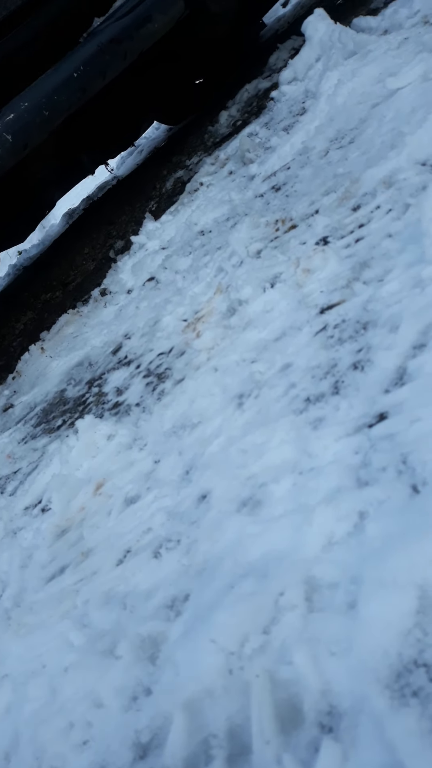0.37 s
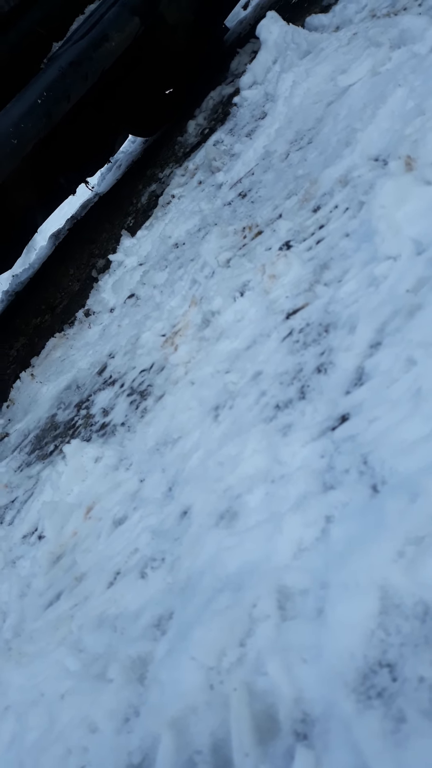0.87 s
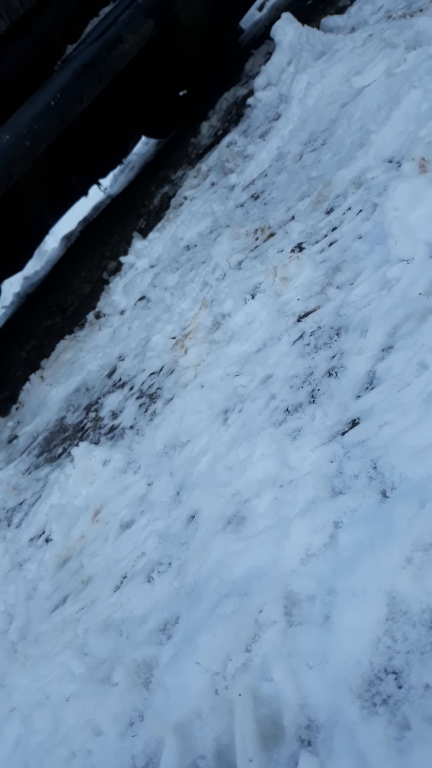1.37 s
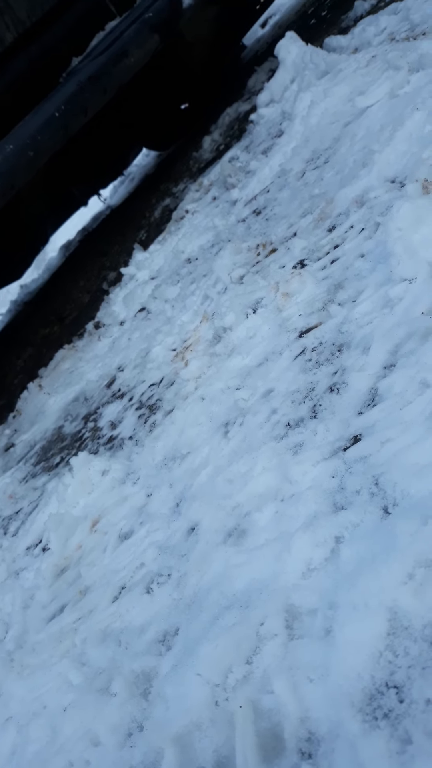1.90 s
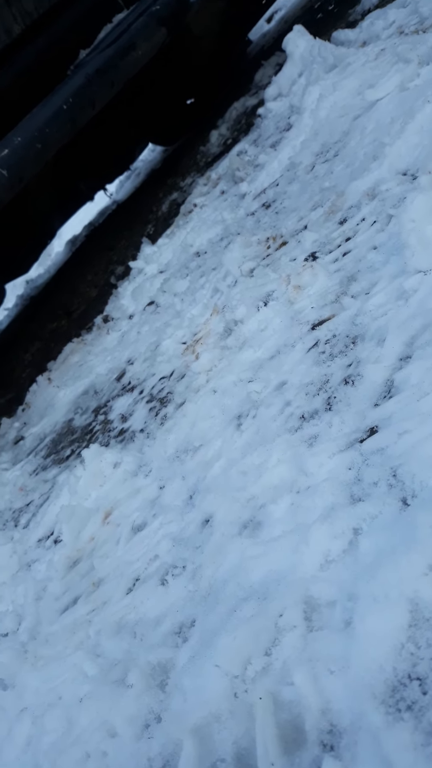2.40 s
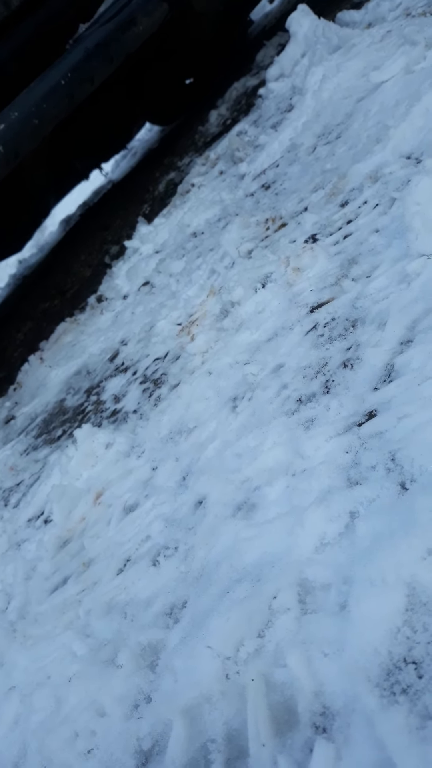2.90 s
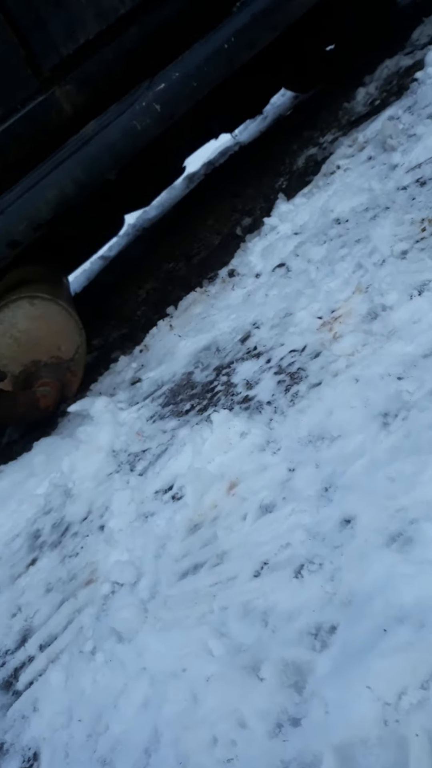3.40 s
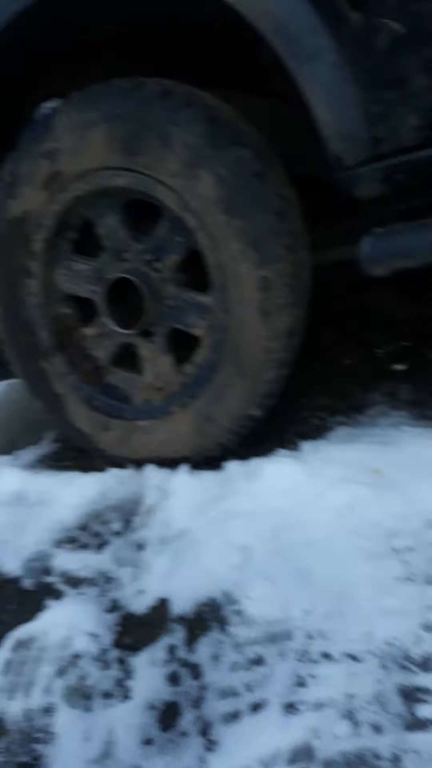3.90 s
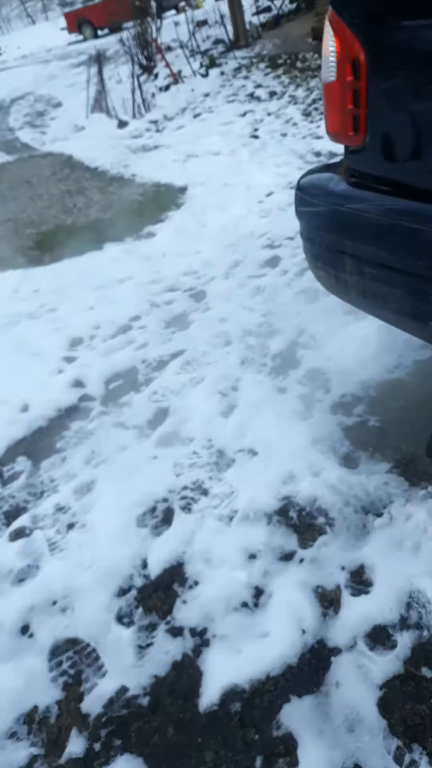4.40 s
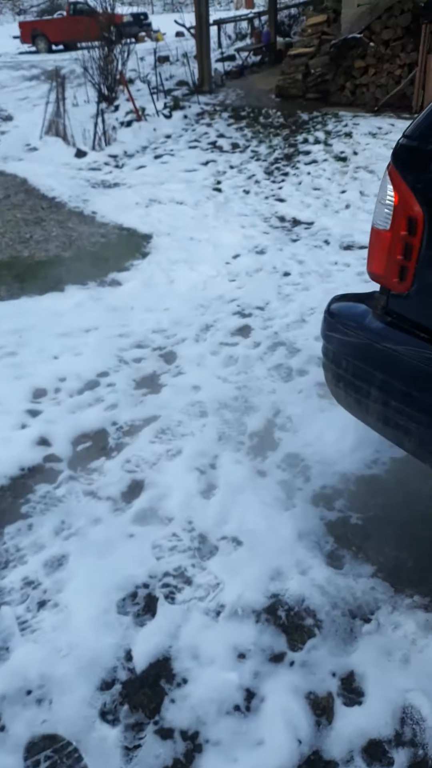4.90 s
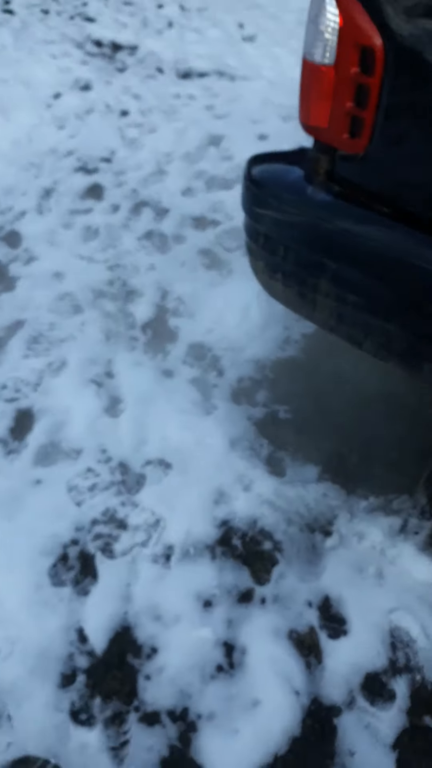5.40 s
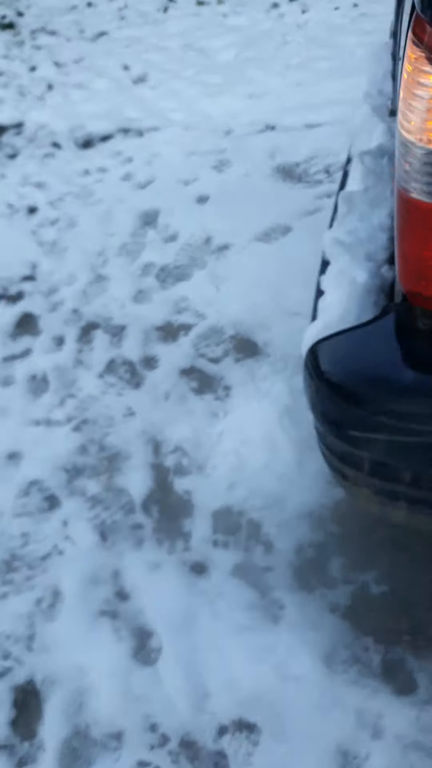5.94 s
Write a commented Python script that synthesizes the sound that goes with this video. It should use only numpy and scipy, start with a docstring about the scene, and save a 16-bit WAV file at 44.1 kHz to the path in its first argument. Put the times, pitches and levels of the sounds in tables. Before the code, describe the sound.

Outdoors, a loud unmuffled engine burbles at a slow, slightly wavering idle, hiss pulsing with each firing and a loose shield ticking on top. Then the handheld stereo microphone moves along the body: upper exhaust tones and hiss drop, a hollow noisy swell passes at the wheel arch, with knocks and snow crunches. Finally the pipe's mid tones come back stronger behind the truck, with more crunching steps.

```python
"""A six-cylinder engine with an open exhaust idles outdoors on snow, three firings a turn ringing the pipe.
At first, beside the sill: the full pipe, hiss puffing with each firing, whines and a loose shield's ticks.
From about 3.5 s the listener walks along the body, which shades the upper pipe tones; snow crunches,
panels knock hollow and noisy tones swell by the wheel arch. From about 5 s, round the rear corner,
nearer the pipe's mouth, most pipe tones rise again and the steps crunch on."""
import sys
import numpy as np
from scipy import signal
from scipy.fft import rfft, irfft, next_fast_len
from scipy.io import wavfile
from scipy.ndimage import uniform_filter1d

SR = 44100
rng = np.random.default_rng(int(sys.argv[2]) if len(sys.argv) > 2 else 0)


def wrap_up_sound(samples):
    """Save the sound to the file named by the first command line argument, as 16-bit audio."""
    columns = np.atleast_2d(samples).T
    # keep every value between -1 and 1, then stretch to whole-number steps
    tamed = np.clip(columns, -1, 1)
    steps = np.round(tamed * 32767).astype(np.int16)
    wavfile.write(sys.argv[1], SR, steps)


def gain_from_db(level_db):
    """Turn a decibel level (scalar or array-like) into a linear amplitude factor."""
    decades = np.asarray(level_db, float) / 20
    return 10 ** decades


N = 266805
T = np.arange(N) / SR  # time, s


def rms_one(x):
    """Scale to rms 1."""
    return x / np.sqrt(np.mean(x ** 2) + 1e-20)


def at_hz(points, hz):
    """Read a spectrum on a log-frequency axis."""
    point_hz, value = np.transpose(points)
    return np.interp(np.log(hz), np.log(point_hz), value)


def drift(rate_hz):
    """Slow random curve of spread 1: noise through two equal low-pass poles, at a fortieth of the rate."""
    r = np.exp(-2 * np.pi * rate_hz * 40 / SR)
    slow = signal.lfilter([1], [1, -2 * r, r * r], rng.standard_normal(N // 40 + 2002))[2000:]
    return np.interp(np.arange(N) / 40, np.arange(len(slow)), rms_one(slow))


def ring(clicks, hz, t60):
    """A resonance: a unit click sets a decaying sine of starting height 1 ringing."""
    r, w = gain_from_db(-60 / (t60 * SR)), 2 * np.pi * hz / SR
    return signal.lfilter([0, np.sin(w)], [1, -2 * r * np.cos(w), r * r], clicks + 1e-18, axis=-1)


def ramp(middle_s, takes_s):
    """Smooth change from 0 to 1."""
    return .5 + .5 * np.tanh(2 * (T - middle_s) / max(takes_s, .02))


def place_db(shaded_s, takes_s, shade_db, corner_db):
    """Change of level as the listener walks into the body's shade, then round the rear corner."""
    corner_s, corner_takes_s = 5.23, 0.77
    return shade_db * ramp(shaded_s, takes_s) + corner_db * ramp(corner_s, corner_takes_s)


def rush_walk_db():
    """The body shades the rush from the listener; the corner does not bring it back."""
    return place_db(shaded_s=4.25, takes_s=0.34, shade_db=-3.5, corner_db=0)


# crankshaft speed at idle: t/s, speed/rpm
CRANK_SPEED = [(0.0, 691.6), (0.25, 684.1), (0.76, 693.3), (1.26, 686.7), (2.02, 690.8), (2.27, 686.1),
               (3.02, 679.8), (3.53, 682.1), (3.78, 678.1), (4.29, 683.4), (4.54, 673.8), (5.04, 681.7),
               (5.29, 683.9), (5.55, 678.1), (6.05, 676.3)]


def crank_rpm():
    """Crankshaft speed at every sample."""
    s, rpm = np.transpose(CRANK_SPEED)
    return np.interp(T, s, rpm)


def firings(margin):
    """Firing count at every sample, three a turn, with a margin of steady running on both sides."""
    start_turns = .781
    turns = np.cumsum(np.pad(crank_rpm(), margin, mode="edge")) / (60 * SR)
    return 3 * (turns - turns[margin] + start_turns + 12)


# likeness of the left and right microphone ports: f/Hz, shared part of the power (0 to 1)
PORT_LIKENESS = [(600, .9), (1000, 0.55), (2000, 0.11), (4000, 0.16), (8000, 0.032), (15000, 0.09)]
# lean of the noise to one port: f/Hz, left minus right level/dB
PORT_LEAN = [(60, 0.0), (130, 0.0), (290, 3), (640, 2), (1410, 2.5), (3100, 3), (6820, -4.5), (15000, -1.5)]
# phase between the ports in the shared noise: f/Hz, left leads by phase/rad
PORT_TWIST = [(640, .2), (1030, .4), (1380, 2.2), (1980, -.1), (2410, 2.5), (3790, .8), (4820, 1.8),
              (8000, 0), (12000, -2.7)]


def banded_noise(spectrum, patchy_db, lift_db):
    """Stereo noise in third-octave bands, each with level, lean, likeness and flicker; lift_db(hz) moves in time."""
    edges = np.append(567 * 2 ** (np.arange(15) / 3), 15700)
    white = rng.standard_normal((2, 3, N))
    quarter_late = signal.hilbert(white[:, 0], next_fast_len(N)).imag[:, :N]  # shared noise, quarter cycle later
    out = 0
    for k, (low, high) in enumerate(zip(edges, edges[1:])):
        shared, left, right = white[k % 2]  # neighbouring bands take different noise
        late = quarter_late[k % 2]
        hz = np.sqrt(low * high)
        alike, twist = np.clip(at_hz(PORT_LIKENESS, hz), 0, 1), at_hz(PORT_TWIST, hz)
        common = np.array([shared, np.cos(twist) * shared + np.sin(twist) * late])
        ports = np.sqrt(alike) * common + np.sqrt(1 - alike) * np.array([left, right])
        band = signal.butter(2, [low, high], "band", fs=SR, output="sos")
        lean = gain_from_db(at_hz(PORT_LEAN, hz) / 2 * np.array([[1], [-1]]))
        gain = gain_from_db(at_hz(spectrum, hz) + patchy_db * drift(26) + lift_db(hz))
        out = out + gain * lean * signal.sosfilt(band, ports)
    return out


def narrow_noise(hz, width_hz, flutter_db):
    """Fluttering noise, partly shared by the ports, twice through one resonance; rms 1."""
    t60 = np.log(1000) / (np.pi * width_hz)
    left, right, shared = rng.standard_normal((3, N))
    lag = round(at_hz(PORT_TWIST, hz) / (2 * np.pi * hz) * SR)
    noise = np.array([shared + .7 * left, np.roll(shared, lag) + .7 * right])
    noise = noise * gain_from_db(flutter_db * drift(22))
    return rms_one(ring(ring(noise, hz, t60), hz, t60))


def rumble():
    """Faint ground rumble under the lowest pipe tone: low noise, the same at both ports."""
    band = signal.butter(2, [30, 60], "band", fs=SR, output="sos")
    return gain_from_db(-53) * rms_one(signal.sosfilt(band, rng.standard_normal(N)))


# narrow whines of the running gear: f/Hz, resonance width/Hz, rms level/dB before the walk
GEAR_WHINES = [(1352.5, 55, -46.5), (2324, 180, -53.5), (2712, 64, -55)]


def whines():
    """Narrow noise bands of the running gear, fading with the rush as the body comes between."""
    out = sum(gain_from_db(db) * narrow_noise(hz, width_hz, flutter_db=2.5) for hz, width_hz, db in GEAR_WHINES)
    return out * gain_from_db(rush_walk_db())


# hollow tones of the rush: f/Hz, resonance width/Hz, steady rms level/dB
HOLLOW_TONES = [(1092, 420, -47), (1560, 190, -62.5), (2044, 170, -60)]
# their swells near the wheel arch, one list per tone: t/s, level/dB at the top, time to fall to 1/e /s
ARCH_SWELLS = [
    [(3.9, -49, 0.29), (4.3, -38.5, .2)],
    [(4.05, -47, .4), (5.3, -51.5, .3)],
    [(3.68, -46, 0.29), (4.25, -47, 0.15)],
]


def hollow_tones():
    """Three noisy hollow tones of the rush that swell as the wheel arch goes by."""
    out = 0
    for (hz, width_hz, steady_db), swells in zip(HOLLOW_TONES, ARCH_SWELLS):
        swell = sum(gain_from_db(db) * np.exp(-((T - s) / half_s) ** 2) for s, db, half_s in swells)
        out = out + np.hypot(gain_from_db(steady_db), swell) * narrow_noise(hz, width_hz, flutter_db=3.5)
    return out


# colour of the gas rush: f/Hz, relative density level/dB
RUSH_SPECTRUM = [(600, -33), (800, -38.5), (1190, -47.5), (2400, -50.5), (3300, -51), (7270, -54.5),
                 (11000, -56.5), (15500, -52.5)]


def rush(puff_db, turn_puff_db):
    """Gas hiss that puffs twice per firing (valve opening and the pipe's return) and swells once a turn."""
    walk_db = rush_walk_db()
    low_db = place_db(*PIPE_PARTS[-1][3:]) - walk_db  # low rush is shaded like the top pipe tones

    def lift_db(hz):
        return low_db * (hz < 900) + .5 * walk_db * (hz > 8000)  # the treble fades further

    noise = banded_noise(RUSH_SPECTRUM, patchy_db=1.0, lift_db=lift_db)
    bright = signal.sosfilt(signal.butter(4, [2500, 7500], "band", fs=SR, output="sos"), noise)
    count = firings(0)
    puffs = puff_db * np.exp(-3.0 * ((2 * count + .25) % 1))
    puffs = puffs + turn_puff_db * np.cos(2 * np.pi * (count / 3 + 0.34))
    bright_db = -44.5  # rms of the 2.5 to 7.5 kHz band before walk and puffs
    return noise / np.std(bright) * gain_from_db(bright_db + walk_db + puffs)


# snow crunches under the steps: start t/s, level/dB at the top, length/s, left minus right level/dB
SNOW_CRUNCHES = [(3.575, -23.5, 0.0087, -8.5), (4.684, -57, 0.022, 3), (5.314, -35.5, 0.038, -9.5),
                 (5.761, -50, 0.015, -12.5), (5.837, -25.5, 0.054, -4), (5.961, -35.5, 0.022, -11),
                 (6.028, -32, 0.03, -9.5)]
# colour of the breaking crust: f/Hz, relative density level/dB
CRUST_COLOUR = [(800, -7.5), (1500, 0.5), (3000, 0), (6000, -3), (10000, -3.5), (14000, 3)]


def crunches(grain_db):
    """Dense grains of breaking crust under a rounded envelope for each crunch."""
    clumps_db = grain_db * np.minimum(rng.exponential(1, N // 60 + 1), 4)  # crust breaks in clumps of 1.4 ms
    grains = rng.standard_normal((2, N)) * gain_from_db(clumps_db).repeat(60)[:N]
    hz = np.maximum(np.fft.rfftfreq(N, 1 / SR), 20)
    colour = gain_from_db(at_hz(CRUST_COLOUR, hz)) * (hz > 600)
    grains = rms_one(irfft(rfft(grains) * colour, N))
    envelope = np.zeros((2, N))
    for s, level_db, length_s, lean_db in SNOW_CRUNCHES:
        share = np.clip((T - s) / length_s, 0, 1)
        port_db = level_db + lean_db / 2 * np.array([[1], [-1]])
        envelope += gain_from_db(port_db) * np.sin(np.pi * share ** .6)
    return grains * envelope


# hollow knocks under the body: t/s, peak level/dB before a 1.5 dB trim, f/Hz of the lower mode
BODY_KNOCKS = [(3.714, -30, 1120), (3.8204, -16, 1040), (3.909, -28.5, 1000), (4.2472, -19, 1115),
               (4.348, -26, 1050), (4.6875, -26.5, 1116), (5.05, -29, 1050), (5.304, -22.5, 1140),
               (5.4972, -26.5, 1070)]


def knocks():
    """Short noise bursts into a hollow panel with a second mode above."""
    out = np.zeros((2, N))
    for s, peak_db, hz in BODY_KNOCKS:
        i = round(s * SR)
        burst = rng.standard_normal((2, 4000)) * np.exp(-np.arange(4000) / (.004 * SR))
        body = ring(burst, hz, .025) + .9 * ring(burst, 1.42 * hz, .025)
        out[:, i:i + 4000] += gain_from_db(peak_db - 1.5) * body / np.abs(body).max()
    return out


# modes of the loose shield: f/Hz, level/dB relative to the blow, t60/s
SHIELD_MODES = [(3778, -3, 0.048), (4100, -11, 0.098), (4380, -5.5, 0.036), (2584, -10, 0.06)]
# single shield blows at set times, many of them loud: t/s, blow level/dB before each mode's level and spread
SINGLE_BLOWS = [(0.5653, -39.5), (0.7411, -30), (0.8273, -33.5), (1.148, -30), (1.2627, -28.5),
                (1.3796, -34), (1.5237, -34.5), (1.6104, -36.5), (1.8728, -32), (1.9603, -34), (2.131, -35),
                (2.3104, -38), (3.1308, -39), (3.3645, -34.5), (5.218, -35.5)]


def shield(spread_db):
    """Loose shield: an uneven tick a tenth of a firing ahead of each pulse, and single blows at set times."""
    at = np.flatnonzero(np.diff((firings(0) + .1).astype(int)))
    hidden_db = -9 * ramp(3.6, .31)
    blow_db = -41.5 + hidden_db[at] + spread_db * rng.standard_normal(len(at))
    single_s, single_db = np.transpose(SINGLE_BLOWS)
    at = np.append(np.round(single_s * SR).astype(int), at)
    blow_db = np.append(single_db, blow_db)
    out = np.zeros((2, N))
    for hz, level_db, t60 in SHIELD_MODES:
        clicks = np.zeros((2, N))
        port_db = rng.normal(0, 2, (len(at), 2)).T
        clicks[:, at] = gain_from_db(blow_db + level_db + port_db) * rng.choice([-1, 1])
        out += ring(clicks, hz, t60)
    return out


# pipe modes: f/Hz, t60/s, relative ring height at firing 1, 2, 3 of a turn
# (a negative height starts the ring upside down)
PIPE_MODES = [(65.5, 0.35, 0.145, 0.14, 0.132), (103.3, 0.04, 0.132, 0.022, 0.144),
              (138.5, 0.17, 0.519, 0.591, 0.445), (164.2, 0.35, -0.312, -0.308, -0.313),
              (207.5, 0.29, 0.035, 0.092, 0.101), (251.0, 0.32, -0.309, -0.185, -0.289),
              (264.4, 0.35, 0.044, 0.005, 0.063), (286.0, 0.35, 0.077, 0.072, 0.118),
              (323.3, 0.35, -0.031, -0.003, 0.022), (355.4, 0.35, -0.083, -0.094, -0.089),
              (366.6, 0.12, 0.134, 0.084, 0.095), (405.0, 0.19, 0.01, 0.023, 0.04),
              (460.0, 0.35, 0.065, -0.017, 0.02), (483.2, 0.35, -0.011, 0.003, 0.06),
              (527.9, 0.35, -0.038, -0.071, -0.06), (550.4, 0.07, -0.034, 0.044, 0.049),
              (609.8, 0.35, -0.001, -0.014, 0.013), (624.0, 0.06, -0.029, 0.014, -0.051),
              (673.0, 0.11, 0.005, 0.001, 0.039), (697.0, 0.17, 0.002, 0.005, -0.031),
              (731.3, 0.04, 0.021, -0.019, 0.021), (805.8, 0.35, 0.0, -0.007, -0.009),
              (846.7, 0.35, 0.002, -0.003, 0.002), (931.1, 0.18, -0.002, 0.002, -0.003)]
# parts of the pipe sound, thump to buzz; the body comes between pipe and listener, mostly at about 4 s:
# low f/Hz, high f/Hz, level/dB beside the sill, half shaded at t/s, shading takes/s,
# level change/dB in the shade, level change/dB round the corner, nearer the pipe's mouth
PIPE_PARTS = [(50, 99, -20, 4.36, .3, -4, 2.5), (85, 155, -10, 4.18, .5, -5, 2),
              (161, 223, -18, 4.9, .4, -2, -0.5), (214.3, 295, -17.5, 3.92, 0.14, -4.5, 9.5),
              (294, 336, -32, 4.0, .4, 3.5, 3), (343, 430, -30, 4.6, .3, -4, 3),
              (422, 600, -26.5, 4.126, .5, -17.5, 9), (607, 1000, -35.5, 4.0, .35, -9.5, 0.5)]


def exhaust(uneven_db, jitter_ms, turn_db):
    """Each firing rings the pipe modes; eight frequency parts reach the listener separately."""
    run_in = (next_fast_len(N + SR, True) - N) // 2
    count = firings(run_in).astype(int)
    at = np.flatnonzero(np.diff(count)) + 1
    chance = rng.standard_normal((len(at), 2))
    other_turn = count[at] % 6 < 3  # cylinders of every other turn differ a little
    strength = gain_from_db(uneven_db * chance[:, 0] + turn_db * other_turn)
    jitter = np.round(jitter_ms / 1000 * SR * chance[:, 1]).astype(int)
    fired = np.clip(at + jitter, 0, len(count) - 1)
    out = 0
    for hz, t60, *heights in PIPE_MODES:
        clicks = np.zeros(len(count))
        clicks[fired] = strength * np.array(heights)[count[at] % 3]
        out = out + ring(clicks, hz, t60)
    # deep bass below about 55 Hz falls away steeply
    out = signal.sosfilt(signal.butter(4, 55, "high", fs=SR, output="sos"), out)
    spectrum, hz = rfft(out), np.fft.rfftfreq(len(out), 1 / SR)
    parts = np.array([irfft(spectrum * (hz >= low) * (hz < high), len(out)) for low, high, *_ in PIPE_PARTS])
    # each part is levelled to rms 1 over three turns before it gets its level along the walk
    three_turns = round(180 * SR / CRANK_SPEED[0][1])
    steady = parts / np.sqrt(uniform_filter1d(parts ** 2, three_turns, axis=1) + 1e-12)
    heard_db = np.array([sill_db + place_db(*walk) for _, _, sill_db, *walk in PIPE_PARTS])
    rpm = crank_rpm()
    speed_db = 0.0976 * (rpm - rpm.mean())  # dB per rpm: louder when the engine runs faster
    return steady[:, run_in:run_in + N] * gain_from_db(heard_db + speed_db)


def to_ports(tones, left_lag_ms):
    """Delay one port and advance the other by half the lag each, as the listener turns."""
    half_lag, i = left_lag_ms / 1000 * SR / 2, np.arange(N)
    return np.array([np.interp(i - side * half_lag, i, tones) for side in (1, -1)])


def scene():
    """Low and upper exhaust tones reach the two ports with their own small lag; other sources join them."""
    parts = exhaust(uneven_db=.35, jitter_ms=.035, turn_db=.4)
    low_lag_ms = -.17 * (ramp(4.1, .3) - ramp(5.4, .3))  # left leads in the lows only in the shade
    upper_lag_ms = -.1 + .21 * np.maximum(T - 3.75, 0)  # steady drift, ms per s, from 3.75 s
    pipe = to_ports(parts[:3].sum(axis=0), low_lag_ms) + to_ports(parts[3:].sum(axis=0), upper_lag_ms)
    background = rumble() + whines() + hollow_tones() + rush(puff_db=4.5, turn_puff_db=0.4)
    small = crunches(grain_db=2.5) + knocks() + shield(spread_db=3.5)
    return background + small + pipe


def band_limit(x):
    """A steep low-pass at the top of the band."""
    return signal.sosfilt(signal.butter(12, 16790, fs=SR, output="sos"), x)


# treble dip of the microphone housing: f/Hz, level/dB
HOUSING_DIP = [(7300, 0), (7800, -8), (8500, -17), (9800, -13.5), (12000, -10), (15500, -13)]


def record(dry):
    """The microphone housing dips the treble from 7.3 kHz, deepest at 8.5 kHz; full scale clips the peaks."""
    size = next_fast_len(N + 4096, True)
    hz = np.maximum(np.fft.rfftfreq(size, 1 / SR), 20)
    heard = irfft(rfft(dry, size) * gain_from_db(at_hz(HOUSING_DIP, hz)), size)[:, :N]
    return band_limit(np.clip(heard, -1, 1))


dry = scene()
out = record(dry)
wrap_up_sound(out)
```